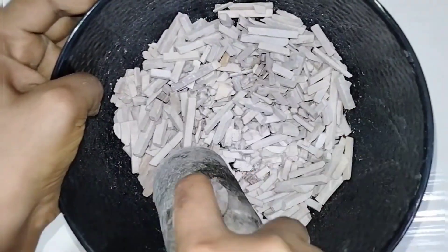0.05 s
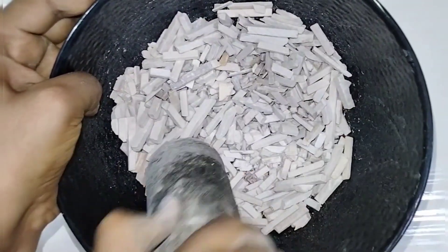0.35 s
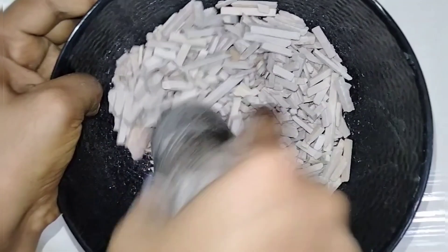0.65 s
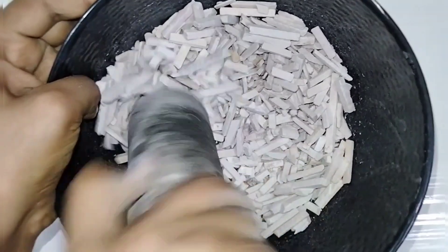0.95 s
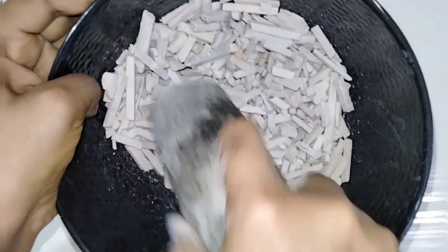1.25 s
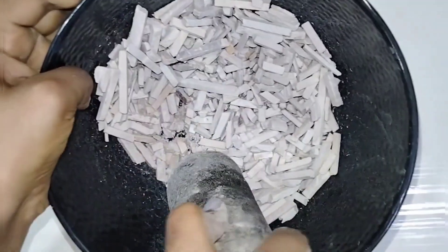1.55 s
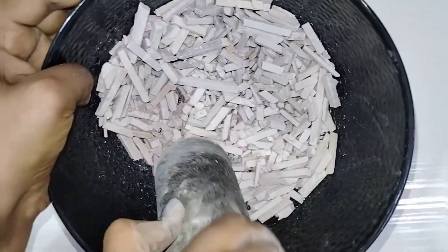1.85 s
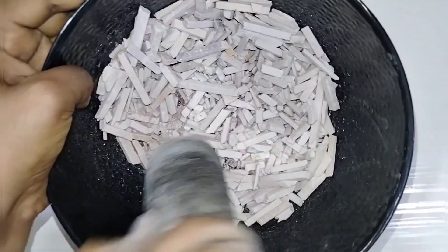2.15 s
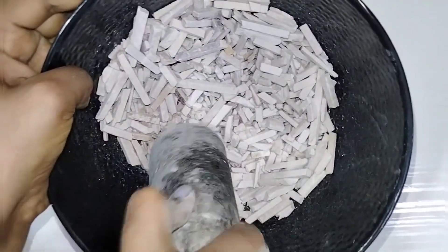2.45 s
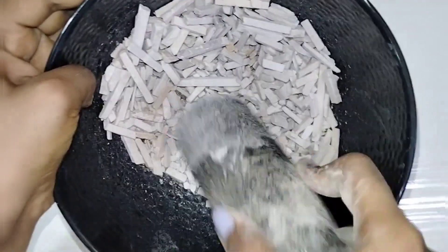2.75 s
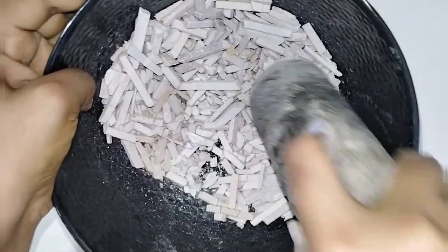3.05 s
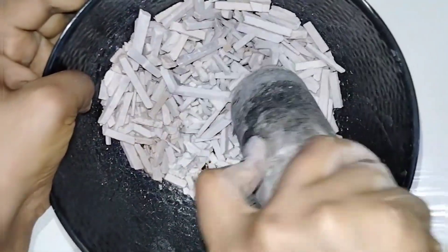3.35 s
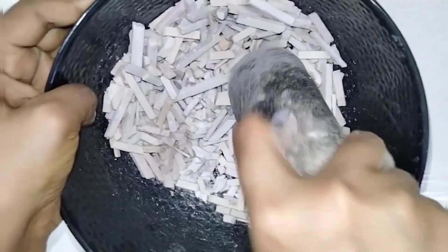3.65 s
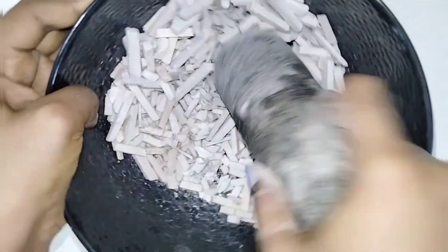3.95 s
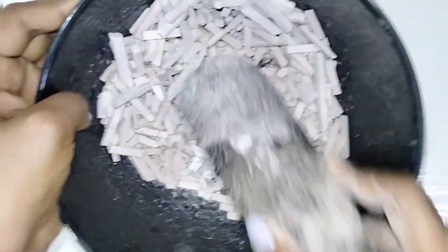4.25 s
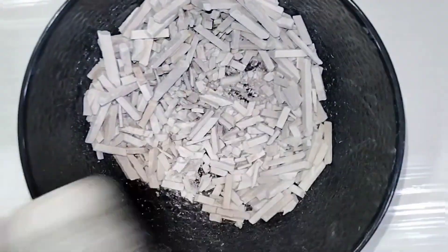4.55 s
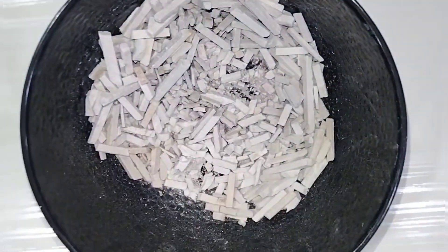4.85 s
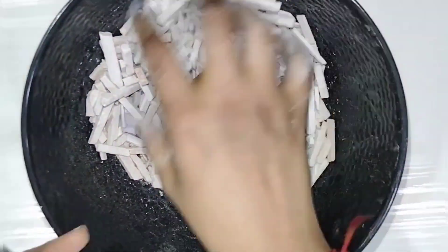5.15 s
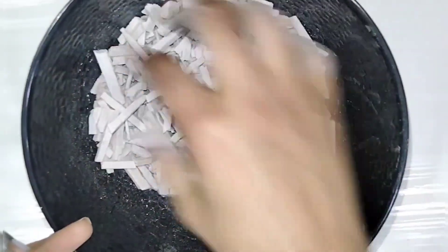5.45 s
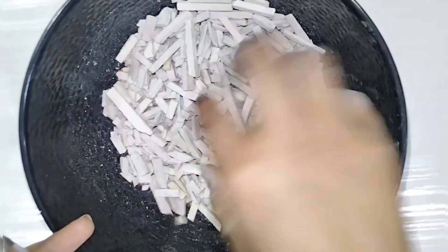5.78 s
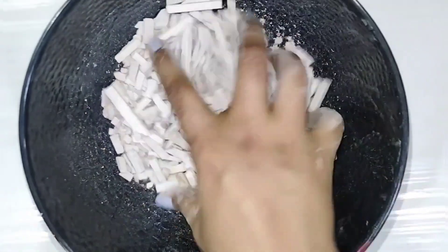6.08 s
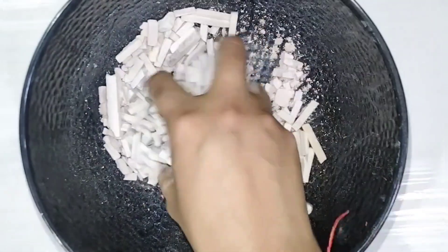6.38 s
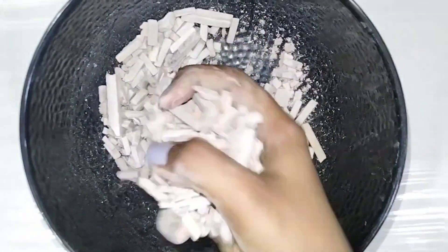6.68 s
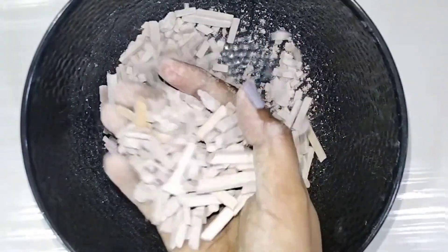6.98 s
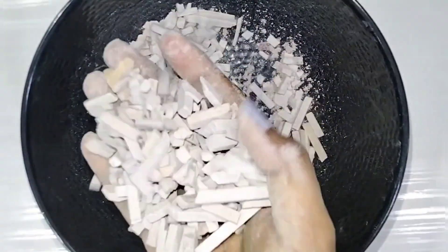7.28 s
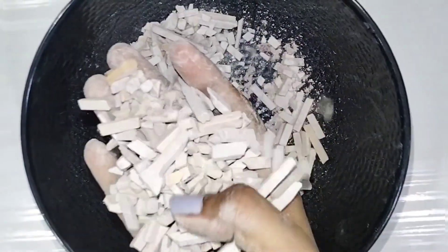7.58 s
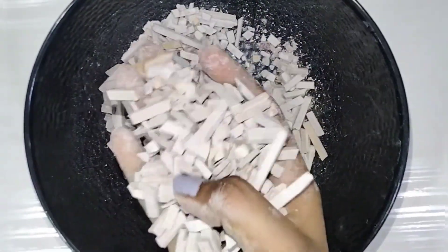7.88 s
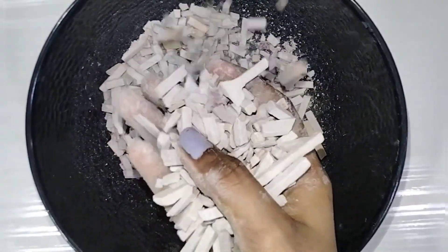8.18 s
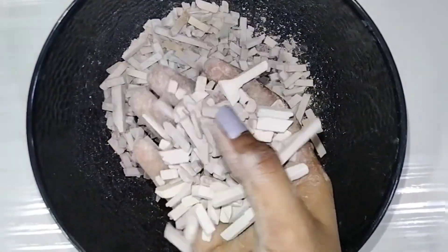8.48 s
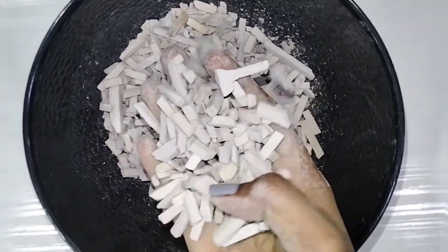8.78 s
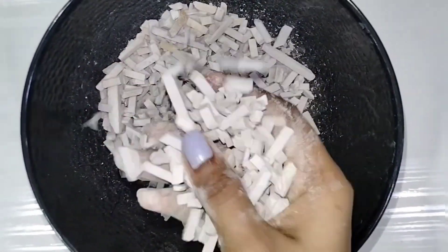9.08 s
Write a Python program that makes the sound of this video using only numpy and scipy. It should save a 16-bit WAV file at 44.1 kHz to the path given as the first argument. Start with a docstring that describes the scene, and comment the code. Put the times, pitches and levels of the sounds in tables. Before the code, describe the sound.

Close, gritty crushing of slate pieces with dull bowl thuds, followed by brighter crunching and clinking as they are kneaded by hand.

```python
"""A small room: slate pencil pieces are crushed by a stone pestle in a hard bowl, then raked and kneaded
by hand, close to a phone. Each push sets the heap crunching and the bowl rumbling: it swells, holds, dies
away and throws off snaps and knocks. A snap is a millisecond crack with the short ring of a slate stick;
a knock is the load dropping on the bowl. The phone's limiter ducks the hiss around the loudest snaps."""
import sys
import numpy as np
from scipy import signal
from scipy.fft import rfft, irfft, next_fast_len
from scipy.io import wavfile
from scipy.ndimage import uniform_filter1d, minimum_filter1d

SR = 44100
rng = np.random.default_rng(int(sys.argv[2]) if len(sys.argv) > 2 else 0)


def bounce(signal):
    """Save signal as a 16-bit WAV file at the path given by the first command-line argument."""
    frames = np.transpose(np.atleast_2d(signal))
    limited = np.clip(frames, -1, 1)
    pcm = np.round(limited * 32767).astype(np.int16)
    wavfile.write(sys.argv[1], SR, pcm)


N = 406602
T = np.arange(N) / SR
SIZE = next_fast_len(N + SR)
FREQ = np.fft.rfftfreq(SIZE, 1 / SR)

# Modes of the loaded bowl. Each row: centre in Hz, width in Hz, gain in dB.
BOWL_MODES = [(121.4, 1.7, 5), (134, 7.8, 4.5), (192.6, 2.2, 4.5), (241, 13.7, 5.5), (276.5, 26, 10.5),
              (322, 63, -7.5), (346.4, 27, 3.5), (396, 10, -20), (418, 29, 4), (470, 99, 0), (572, 50, 2.5),
              (684.3, 32, 8), (756, 44, 7), (803, 37, -2), (1280, 360, -3.5), (2373, 62, -1),
              (4630, 46, -2)]
# Slate click spectrum at the microphone ports. Each row: frequency in Hz, left and right gain in dB.
CLICK_SPECTRUM = [(300, -27, -36), (770, -18, -32), (1280, -14.5, -19.5), (1920, -22.5, -20),
                  (2360, -13, -11), (4030, -12, -8), (4740, -14.5, -14.5), (6700, -17.5, -9.5),
                  (6870, -31, -11), (8370, -17.5, 2.5), (9850, -18, -6.5), (12000, -18, -16),
                  (13200, -27, -14.5), (16700, -33, -21.5)]


def undb(db):
    """Decibels to gain."""
    return 10 ** (np.asarray(db) / 20)


def unit(x):
    """Scale to rms 1."""
    return x / np.sqrt(np.mean(x ** 2))


def colour(table, f):
    """Left and right gains of a spectrum table."""
    hz, *ports_db = np.transpose(table)
    return undb([np.interp(np.log(f + 1), np.log(hz), db) for db in ports_db])


def causal(gain):
    """Minimum-phase response with these gains: rings only after the blow."""
    cepstrum = irfft(np.log(gain))
    half = cepstrum.shape[-1] // 2
    cepstrum[..., 1:half] *= 2
    cepstrum[..., half + 1:] = 0
    return np.exp(rfft(cepstrum))


def mode(f, hz, width_hz):
    """One resonance, gain 1 at its centre."""
    return 1j * f * width_hz / (hz ** 2 - f ** 2 + 1j * f * width_hz)


def shape(x, response):
    """Filter a whole track by a frequency response."""
    return irfft(rfft(x, SIZE) * response, SIZE)[..., :N]


def add(out, start_s, sound):
    """Mix in a short sound."""
    i = max(int(start_s * SR), 0)
    part = out[..., i:i + sound.shape[-1]]
    part += sound[..., :part.shape[-1]]


def sides(pan_db):
    """Left and right gains of unit mean power; positive is left."""
    return unit(undb([[pan_db / 2], [-pan_db / 2]]))


def contacts(per_s, spread_db):
    """Random tiny impacts: many faint, a few strong."""
    size = undb(spread_db * np.minimum(rng.exponential(size=N), 4.5))
    return unit((rng.random(N) < per_s / SR) * size * rng.choice([-1, 1], N))


def pushes(sag_db_per_s=4, rest_db=-52.5):
    """Stir, scrape and drag envelopes: a push eases as pieces make way; the heap settles in between."""
    # Pestle presses, then hand rakes. Each row: start in seconds, length in seconds, fine crunch in dB,
    # coarse scraping relative to it in dB, drag on the bowl in dB.
    presses = [(0, 0.01, -19.5, -9.5, -19), (.18, 0.17, -37, -5, -30), (.33, 0.043, -24, -7, -22),
               (.43, 0.036, -34.5, 2.5, -20), (.52, 0.19, -29, -2.5, -31), (.74, 0.058, -29.5, -4, -23.5),
               (.82, 0.12, -29, -1, -45), (.915, 0.077, -23.5, -3.5, -18.5), (1.095, 0.075, -30, 4, -25),
               (1.5, .04, -46, -12, -27.5), (1.59, 0.046, -27, -15, -27.5), (1.7, 0.043, -30.5, -7, -22.5),
               (1.79, 0.026, -29, -5, -28), (1.99, 0.076, -34, -6.5, -25.5), (2.15, .06, -46, -1, -24),
               (2.27, 0.054, -35, 4, -24.5), (2.34, 0.03, -19.5, -3, -41), (2.46, 0.028, -33, 0.5, -27.5),
               (2.65, 0.015, -38, 4, -31), (3.11, 0.022, -32.5, -3, -25.5),
               (3.265, 0.024, -25.5, 0.5, -21.5), (3.35, 0.15, -39.5, 0, -33), (3.545, 0.055, -26, 1, -19),
               (3.65, 0.11, -36.5, -2, -28), (3.75, 0.018, -41, 3, -25), (3.885, 0.053, -28.5, -2.5, -21),
               (4.0, 0.043, -34.5, 5, -28), (4.2, .16, -41.5, -8, -40.5), (4.48, 0.018, -41, -10, -48),
               (4.66, 0.011, -34.5, -10, -55)]
    rakes = [(5.135, 0.1, -27.5, -15, -37.5), (5.26, 0.056, -29.5, -3.5, -34.5),
             (5.47, 0.19, -30, -11, -32), (5.61, 0.064, -19, -14, -30), (5.75, .07, -33.5, -20, -36.5),
             (5.9, 0.13, -29.5, -17, -32.5), (5.99, .04, -26.5, -12, -24.5), (6.05, 0.16, -22, -12, -34.5),
             (6.22, 0.16, -28, -2.5, -36), (6.42, 0.046, -28.5, -5, -39), (6.49, 0.023, -20, -10, -30.5),
             (6.56, 0.067, -27, -13, -38), (6.67, 0.025, -20, -29, -37), (6.76, .05, -36, -7, -46),
             (6.925, 0.12, -20, -8.5, -41), (7.12, 0.24, -27, -25, -45.5), (7.31, 0.089, -24, -32, -47),
             (7.43, 0.069, -29, -7, -32.5), (7.5, 0.15, -25.5, -25, -37.5), (7.75, 0.072, -32.5, -3, -40),
             (8.01, 0.032, -19, -7, -53), (8.105, 0.038, -22, -12, -32), (8.21, .08, -28.5, -18, -38.5),
             (8.375, 0.077, -25, -4, -39), (8.54, 0.043, -35, -3, -34.5), (8.645, 0.042, -21, -17, -38),
             (8.72, 0.051, -35, -1, -48), (8.875, 0.077, -20, -19, -36.5), (8.99, 0.036, -22.5, -8, -36),
             (9.07, 0.075, -27, -7, -48), (9.135, 0.11, -20.5, -15, -30.5)]
    power, t = np.zeros((3, N)), np.arange(SR // 2) / SR
    for strokes, attack_s, release_s in (presses, 0.005, 0.047), (rakes, 0.011, 0.032):
        for start_s, length_s, fine_db, coarse_db, drag_db in strokes:
            release = np.exp(-np.maximum(t - length_s, 0) / release_s)
            effort = np.minimum(t / attack_s, 1) * undb(-sag_db_per_s * t) * release
            gains = undb([[fine_db], [fine_db + coarse_db], [drag_db]])
            add(power, start_s, (gains * effort) ** 2)
    return np.sqrt(power + undb(rest_db) ** 2)


def crunch(stir, scrape, gain_db=-1, split_hz=5500, low_hz=1200, dust_db=-5, burst_s=0.0036):
    """Countless small contacts in the heap, over the hiss of rubbing dust."""
    ticks = contacts(per_s=650, spread_db=3.5)
    t = np.arange(SR // 200) / SR
    bursts = np.sqrt(np.convolve(ticks ** 2, np.exp(-t / burst_s))[:N])
    grit = unit((unit(bursts) + undb(dust_db)) * rng.standard_normal((2, N)))
    ports = colour(CLICK_SPECTRUM, FREQ)
    upper = 1 / (1 + (split_hz / (FREQ + 1)) ** 6)
    fine_band = unit(ports * np.sqrt(upper))
    coarse_band = unit(ports * np.sqrt(1 - upper) / (1 + (low_hz / (FREQ + 1)) ** 4))
    fine = shape(grit * stir, fine_band) * sides(pan_db=-3)
    coarse = shape(grit * scrape, coarse_band) * sides(pan_db=-2)
    return (fine + coarse) * undb(gain_db)


def bowl(f):
    """The bowl's response to a push: the sum of its modes."""
    return sum(undb(db) * mode(f, hz, width_hz) for hz, width_hz, db in BOWL_MODES)


def radiation(f, lowest_hz=112):
    """A small bowl moves little air below its lowest mode."""
    highpass = 1 / np.sqrt(1 + (lowest_hz / (f + 1)) ** 10)
    return causal(np.maximum(highpass, 0.1))


def grinding(drag, gain_db=-2.5, soft_hz=1150):
    """Stick and slip of pieces on the bottom keeps the bowl rumbling."""
    slips = contacts(per_s=900, spread_db=0.5) * drag * undb(gain_db)
    body = bowl(FREQ) * radiation(FREQ) / (1 + (FREQ / soft_hz) ** 4)
    return shape(slips, body / np.sqrt(np.mean(abs(body) ** 2)))


def clinks(stir, count=900, gain_db=-6, spread_db=5.5, low_hz=4500, high_hz=14000, decay_s=0.0009):
    """Chips tap each other as the heap moves, each at its own pitch."""
    out, t = np.zeros((2, N)), np.arange(400) / SR
    fade = np.exp(-t / decay_s)
    for when, pitch, size, where, phase in rng.random((count, 5)):
        hz = low_hz * (high_hz / low_hz) ** pitch
        tone = np.sin(2 * np.pi * (hz * t + np.array([[0], [phase]])))
        tap = (tone + 0.5 * rng.standard_normal((2, len(t)))) * fade
        gain = undb(-spread_db * np.log(size + 0.014))
        add(out, when * N / SR, tap * sides(pan_db=10 * (where - 0.5)) * gain)
    return unit(shape(out, np.sqrt(colour(CLICK_SPECTRUM, FREQ)))) * stir * undb(gain_db)


def air(apart_hz=1100):
    """Steady room air: bass mostly common to both ports, separate hiss in the treble."""
    # Noise floor. Each row: frequency in Hz, left and right density in dB per Hz.
    noise_floor = [(25, -105, -100), (61, -73.5, -75.5), (112, -79, -77.5), (228, -68.5, -69),
                   (594, -69.5, -68.5), (885, -71.5, -71), (1580, -75.5, -73), (2600, -82, -72.5),
                   (3980, -91, -73), (5000, -127, -82.5), (7050, -105, -79.5), (8670, -98, -70.5),
                   (11200, -98, -87.5), (15000, -103, -84.5)]
    common, own = rfft(rng.standard_normal(SIZE)), rfft(rng.standard_normal((2, SIZE)))
    apart = np.clip(0.14 + 1 / (1 + (apart_hz / (FREQ + 1)) ** 2), 0, 1)
    spectrum = (np.sqrt(1 - apart) * common + np.sqrt(apart) * own) * colour(noise_floor, FREQ)
    return irfft(spectrum, SIZE)[:, :N] * np.sqrt(SR / 2)


def small_knocks(drag, count=55):
    """Rows for knocks(): random lesser blows, as strong as the drag on the bowl."""
    for when, size, hardness in rng.random((count, 3)):
        db = 20 * np.log10(drag[int(when * N)]) - 6 + 8 * size
        yield when * N / SR, db, -12 + 14 * hardness


def knocks(drag, scuff_s=0.0032, soft_hz=1020, place_db=3.5):
    """A piece gives way and the load drops on the bowl: damped thud and clack, then the modes ring on."""
    # Loudest blows. Each row: start in seconds, level in dB, hardness as tilt in dB per octave.
    blows = [(0.0322, -22, -12.5), (.141, -20, -2), (0.1626, -21, -6), (0.1878, -12, 3), (0.2307, -12, 1.5),
             (.2675, -15, 3.5), (.309, -9.5, -3.5), (.333, -9, 16), (0.4026, -12, 5), (.4375, -15, 4),
             (0.5175, -16.5, 4.5), (0.5295, -10, -2), (.573, -15.5, -2), (0.621, -17.5, -10.5),
             (0.7499, -14, -1.5), (0.7808, -19, -11), (0.8187, -14, -3), (0.9181, -12, 2),
             (0.9581, -12, -3), (1.1186, -25.5, -14), (1.1748, -21, -18.5), (1.4995, -8, 3), (1.728, -9, 1),
             (1.762, -19.5, -6), (1.8012, -16.5, -2), (1.893, -25, -12), (1.9661, -19, -1),
             (2.0011, -17.5, -14.5), (2.0298, -18.5, -10), (2.0593, -14, 8), (2.1256, -11.5, -4.5),
             (2.1524, -7, -0.5), (2.1806, -11.5, -4.5), (2.3122, -20, -7), (2.3562, -15.5, -8.5),
             (2.3995, -21.5, -2), (2.4503, -16.5, -10.5), (2.4705, -19, -16), (3.137, -26, -15),
             (3.2704, -7.5, -1), (3.3149, -19, -10), (3.3956, -20.5, -2.5), (3.4475, -16.5, 3.5),
             (3.5422, -9, -4), (3.6037, -9.5, 2), (3.7518, -13.5, 0), (3.8892, -22.5, -8),
             (3.9076, -12.5, -14), (3.94, -18, -6.5), (4.413, -27.5, -9.5), (5.1052, -30, -12),
             (5.632, -11.5, 1), (6.0053, -16.5, 0), (6.1515, -28, 14), (6.2103, -29, 14), (6.4998, -27, 5),
             (7.7636, -23.5, 8), (8.4482, -24.5, 13), (8.638, -17, 11), (8.7825, -26, 11),
             (8.889, -23.5, 9.5), (8.9948, -18.5, 4), (9.0247, -22.5, 4)]
    out, t = np.zeros(N), np.arange(8192) / SR
    f = np.fft.rfftfreq(len(t), 1 / SR)
    modes = np.array([undb(db) * mode(f, hz, width_hz) for hz, width_hz, db in BOWL_MODES])
    thud = undb(3) * mode(f, 304, 52) + undb(1) * mode(f, 326, 52)
    clack = mode(f, 682, 64)
    softness = 1 / (1 + (f / soft_hz) ** 8) + 0.034 / (1 + f / 2000) ** 2
    radiated = radiation(f)
    for start_s, db, tilt_db in [*blows, *small_knocks(drag)]:
        force = 0.087 * rng.standard_normal(len(t)) * np.exp(-t / scuff_s)
        force[0] -= 1  # the impact
        # each place on the bowl favours other modes
        weights = undb(place_db * rng.standard_normal((len(modes), 1)))
        body = (weights * modes).sum(axis=0) + thud + clack
        contact = undb(tilt_db * np.log2(np.clip(f, 170, 800) / 450)) * softness
        ring = irfft(rfft(force) * body * radiated * causal(contact))
        add(out, start_s, ring * undb(db) / ring[:SR // 100].std())
    return out


def small_snaps(stir, count=110, low_hz=5500, high_hz=13000):
    """Rows for snaps(): random lesser cracks, as strong as the heap is stirred."""
    for when, size, pitch, sharpness, where in rng.random((count, 5)):
        db = 20 * np.log10(stir[int(when * N)]) + 2 + 8 * size
        hz = low_hz * (high_hz / low_hz) ** pitch
        yield when * N / SR, db, hz, 2 + 8 * sharpness, -20 + 18 * where


def snaps(stir, rise_s=0.000067, crack_s=0.0018, ring_db=5, width_share=0.11,
          rebound_db=-4, rebound_s=0.00219, settle_db=-22, settle_s=0.022, common_share=0.36):
    """A crack rings the stick as a free bar, damped by the heap; its far end hits back, crumbs settle."""
    # Loudest snaps. Each row: start in seconds, level in dB, ring in Hz, tilt in dB per octave,
    # left minus right in dB.
    breaks = [(0.187, -22.5, 1370, 0, -10), (0.2296, -19, 6300, 0, -11), (0.309, -17.5, 1380, 4, -12),
              (.332, -9, 3670, -2.5, -7), (0.345, -9, 6600, 5, -10), (.516, -7.5, 1500, -5.5, -3),
              (0.529, -10.5, 5170, -2, -9), (0.576, -8.5, 11400, -4, -3), (0.6205, -12.5, 7060, -5, -1),
              (.6785, -8.5, 2700, -9.5, -9), (.7307, -15, 7200, -2, -19), (0.748, -14, 2640, -5.5, -13),
              (0.7982, -15.5, 13700, 0, 0), (0.8167, -2.5, 2120, 5, -11), (.917, -5, 1380, 4.5, -3.5),
              (0.987, -19, 1380, 11, 1), (1.142, -17, 6030, -3, -18), (1.4984, -2.5, 6200, 3.5, -6.5),
              (1.526, -15, 8800, 0, -22), (1.728, -15, 2070, 0, -9.5), (1.763, -12, 6200, 6, -9),
              (1.8138, -12, 8550, 2, -19), (2.0025, -16, 14600, 5, -14), (2.125, -21.5, 1370, 3.5, -9),
              (2.1517, -12.5, 1710, -4.5, -5), (2.181, -12, 10900, -1, -5), (2.3587, -4.5, 8050, 0.5, -3.5),
              (2.3749, -16.5, 2490, -14, -4), (2.489, -15.5, 7920, -1, -24), (2.5156, -12.5, 7360, 0.5, -2),
              (3.2619, -15, 3680, -7, -7), (3.268, -8.5, 8400, -7, -8), (3.3945, -13.5, 3700, -3, -11),
              (3.5403, -15.5, 3430, -10, -5), (3.5548, -14, 8100, 4, -4), (3.6036, -9.5, 3500, -0.5, -5),
              (3.6854, -16, 7800, 1, -14), (3.7505, -17, 4500, 0, -8), (3.8826, -18.5, 5940, -3, -8),
              (3.911, -19, 2200, -10, -5), (4.4797, -17, 7440, -3, -17), (5.1489, -24, 4270, 1, -19),
              (5.328, -21, 8870, -8, -15), (5.3809, -0.5, 6100, 13, -5), (5.474, -14, 8850, 13, -24),
              (5.6101, -15, 8900, 12, -25), (5.7036, -7, 9500, 4.5, -9), (5.818, -19, 10200, 2, -25),
              (6.083, -14, 9450, 10, -21), (6.142, -13, 13870, 16, -11), (6.1868, -13, 8000, 6, -9),
              (6.271, -7, 9400, 3.5, -3.5), (6.3318, -6, 8900, 5, -2), (6.4396, -15, 8100, -2.5, -13),
              (6.4967, -9, 13780, 5, -2.5), (6.563, -6.5, 13400, 3.5, -8), (6.6697, -8, 5950, 5.5, -9.5),
              (6.891, 0.5, 2420, 0.5, 4), (6.921, -6, 5130, 2, -10), (6.9435, -9, 14380, 0, -3),
              (6.9585, -6, 14200, 4.5, 3), (7.018, -12, 9150, 15, -3), (7.0315, -11, 9200, 1, -3),
              (7.045, -11.5, 4770, 8, -1), (7.089, -11, 13010, 7, -3), (7.122, -14, 5000, 9, -27),
              (7.17, -14, 9450, 18, -9), (7.2096, -6.5, 8800, 7, -7), (7.221, -11, 13950, 7.5, -2),
              (7.279, -13, 8300, 7, -8), (7.311, -10.5, 9400, 6, -14), (7.345, -3, 9000, 14, -9),
              (7.391, -11.5, 12100, 6, -6), (7.468, -16.5, 5170, 7, -23), (7.4987, -11.5, 9500, 11, -16),
              (7.5098, -9.5, 10420, 6, -13), (7.5554, -11.5, 4680, 9, -13), (7.6232, -4, 9600, 7, -5.5),
              (7.723, -12.5, 8000, 5, -16), (7.752, -14.5, 3900, 0, 0), (7.7619, -4.5, 10600, 2.5, 0),
              (7.8516, -13.5, 10590, 4, -25), (7.941, -23.5, 14470, -0.5, -16), (8.0014, 5, 2870, 2, -7),
              (8.0201, -15, 7750, 5, -21), (8.0806, -14, 9220, 3, -28), (8.1081, -4.5, 8700, 5.5, -4),
              (8.2115, -10, 13870, 9, -7), (8.222, -14, 13440, 11, -5), (8.2555, -8, 9500, 5.5, 3),
              (8.2648, -9, 8350, 8, 0), (8.2809, 3.5, 4740, 5, -3.5), (8.3473, -11.5, 2540, -3.5, 1),
              (8.4465, -14, 10600, 15, -11), (8.45, -11, 12750, 0.5, -5), (8.471, -17, 14300, 1, -7),
              (8.5588, -17.5, 2300, -2, -15), (8.587, -13.5, 6250, 5, -10), (8.637, -7.5, 3360, 3, 9),
              (8.661, -4.5, 7500, 8, 10), (8.7546, -18.5, 2540, -5.5, -10), (8.7815, 0, 7640, 8.5, 8),
              (8.8834, -4, 6950, 3.5, 2), (8.9492, -1.5, 4600, 6.5, -7.5), (8.9863, -9.5, 10800, 6, -6),
              (9.0182, -3, 7920, 8, 2), (9.0732, -14, 12830, 1, 5), (9.1322, -3, 11000, 10.5, -4),
              (9.167, -11.5, 10590, 3.5, -3), (9.206, -15, 11600, 1, -3)]
    out, t = np.zeros((2, N)), np.arange(1536) / SR
    f = np.fft.rfftfreq(len(t), 1 / SR)
    ports = colour(CLICK_SPECTRUM, f)
    crack = (1 - np.exp(-t / rise_s)) * np.exp(-t / crack_s)
    for start_s, db, hz, tilt_db, pan_db in [*breaks, *small_snaps(stir)]:
        overtone_hz = 2.76 * hz
        overtone = mode(f, overtone_hz, width_share * overtone_hz)
        stick = 1 + undb(ring_db) * mode(f, hz, width_share * hz) + overtone
        tilt = undb(tilt_db * np.log2(np.clip(f, 2000, 11000) / 5000))
        rebound = undb(rebound_db) * np.interp(t - rebound_s * rng.uniform(0.1, 1), t, crack)
        common = np.sqrt(common_share) * rng.standard_normal(len(t))
        own = np.sqrt(1 - common_share) * rng.standard_normal((2, len(t)))
        crumbs = unit(rng.standard_normal(len(t)) ** 5) * undb(settle_db) * np.exp(-t / settle_s)
        force = (crack + rebound) * (common + own) + crumbs
        click = irfft(rfft(force) * stick * causal(ports * tilt))
        click /= np.sqrt(np.sum(click ** 2, axis=1, keepdims=True) / (0.005 * SR))  # as 5 ms at rms 1
        add(out, start_s, click * sides(pan_db) * undb(db))
    return out


def rocking(thump_hz=62, decay_s=0.0092):
    """The hardest presses bump the bowl's foot on the table: one deep, almost dead swing."""
    # Each row: start in seconds, level in dB.
    bumps = [(0.335, -26), (0.817, -21), (2.153, -29), (2.182, -27), (3.27, -35), (3.6, -39)]
    out, t = np.zeros(N), np.arange(SR // 10) / SR
    for start_s, db in bumps:
        add(out, start_s, undb(db) * np.sin(2 * np.pi * thump_hz * t) * np.exp(-t / decay_s))
    return out


def reflections(near_s=0.0081, near_db=-17, far_s=0.0182, far_db=-15, apart_s=0.000286):
    """Response of the two nearest hard surfaces: distinct slaps, slightly apart at the two ports."""
    skew_s = np.array([[0], [apart_s]])
    near = undb(near_db) * np.exp(-2j * np.pi * FREQ * (near_s + skew_s))
    far = undb(far_db) * np.exp(-2j * np.pi * FREQ * (far_s - skew_s))
    return near + far


def room(low_db=-10, high_db=-9, low_t60_s=0.52, high_t60_s=0.42, gap_s=0.014, split_hz=900):
    """Response of hard walls a couple of metres off."""
    t = np.arange(int(0.8 * SR)) / SR
    onset = 1 / (1 + (gap_s / (t + 1e-4)) ** 6)
    low = rng.standard_normal((2, len(t))) * onset * undb(-60 * t / low_t60_s)
    high = rng.standard_normal((2, len(t))) * onset * undb(-60 * t / high_t60_s)
    low = low[0] + 0.17 * low[1] * np.array([[1], [-1]])  # bass much alike at both ports
    low, high = (rfft(unit(tail) / np.sqrt(len(t)), SIZE) for tail in (low, high))
    bass = 1 / (1 + (FREQ / split_hz) ** 4)
    return undb(low_db) * bass * low + undb(high_db) * (1 - bass) * high


def scene(coupling_db=1, right_lag_s=0.00014, shadow_hz=480):
    """Slate and bowl, a little nearer the left port, in the room."""
    stir, scrape, drag = pushes()
    # the phone's body shades the right port: higher modes get 1 dB less than the bass
    right_db = 0.5 + 1 / (1 + (FREQ / shadow_hz) ** 4)
    shade = undb(np.array([[0], [1]]) * right_db)
    body = shape(knocks(drag) + grinding(drag) + rocking(), shade) * sides(pan_db=4)
    clicks = snaps(stir) + clinks(stir) + crunch(stir, scrape)
    slate = shape(clicks, 1 + undb(coupling_db) * bowl(FREQ))  # every click also rings the bowl
    direct = np.exp(-2j * np.pi * FREQ * np.array([[0], [right_lag_s]]))
    return shape(slate + body, direct + reflections() + room()) + air()


def record(dry, threshold_db=-6, release_s=0.1, ahead_s=0.008, bass_share=0.6, top_hz=15700):
    """The phone's look-ahead limiter, most alert to treble; then clipping and a low-pass."""
    sensed = shape(dry, 1 - (1 - bass_share) / (1 + (FREQ / 1200) ** 2))
    power = uniform_filter1d(sensed ** 2, int(0.002 * SR), axis=1).max(axis=0)
    over_db = np.maximum(10 * np.log10(np.maximum(power, 1e-12)) - threshold_db, 0)
    ahead = int(ahead_s * SR)
    over_db = -minimum_filter1d(-over_db, 2 * ahead)
    # each reduction fades exponentially until a stronger one takes over
    held_db = np.exp(np.maximum.accumulate(np.log(over_db + 1e-9) + T / release_s) - T / release_s)
    limited = np.clip(dry * undb(-uniform_filter1d(held_db, ahead)), -1, 1)
    lowpass = signal.ellip(8, 0.2, 70, top_hz, fs=SR, output="sos")
    return signal.sosfilt(lowpass, limited)


dry = scene()
out = record(dry)
bounce(out)
```